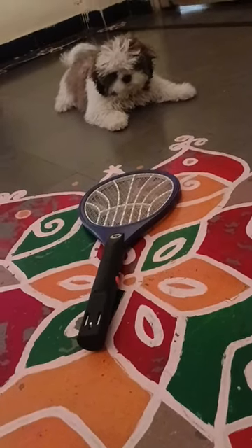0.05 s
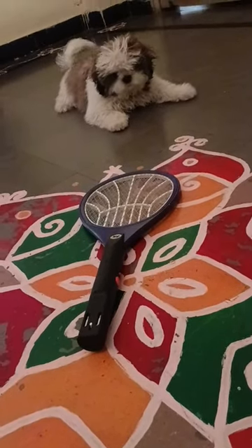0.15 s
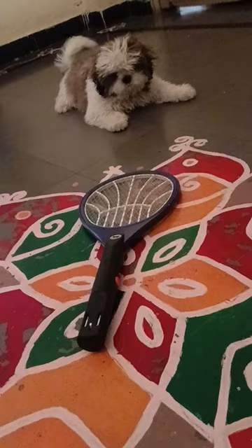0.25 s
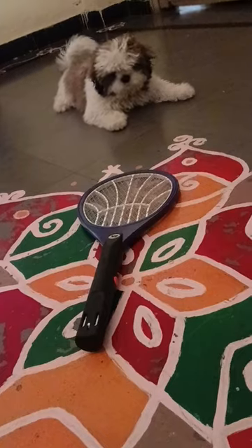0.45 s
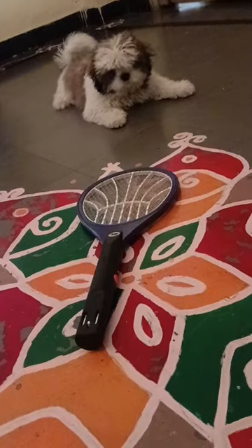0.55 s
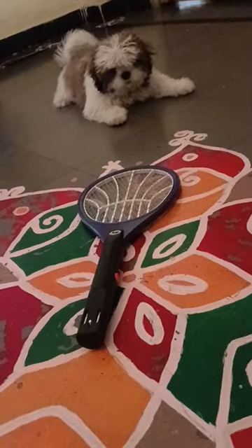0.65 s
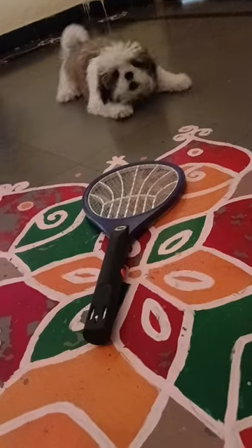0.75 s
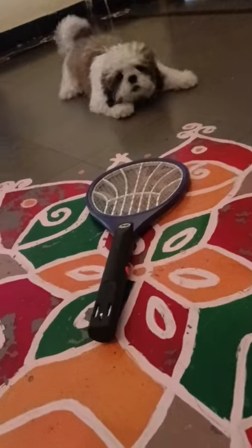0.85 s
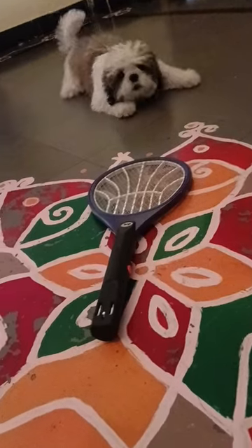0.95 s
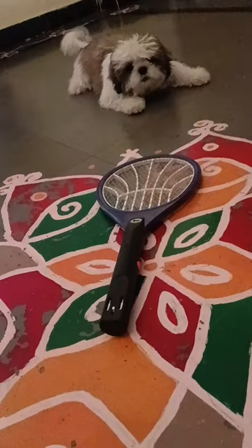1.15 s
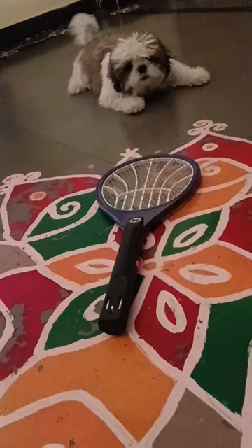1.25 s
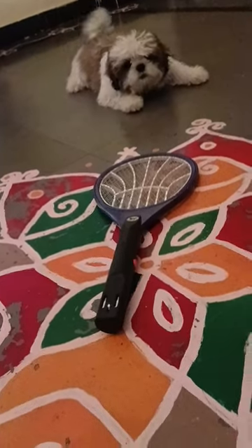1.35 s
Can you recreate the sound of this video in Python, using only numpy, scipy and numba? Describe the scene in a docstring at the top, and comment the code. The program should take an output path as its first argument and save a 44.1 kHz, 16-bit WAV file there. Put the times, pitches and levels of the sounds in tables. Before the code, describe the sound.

A puppy yaps once at about 0.2 seconds, a short, high, slightly rough bark that rises and falls in pitch. Its echo rings in the hard room and fades by about 0.8 seconds. A fan-like rush and hum dips under the bark, then swells back. Soft low bumps come at the start, near 0.8 and around 1.2 to 1.4 seconds, with faint floor scuffs near 0.7 and 1.1.

```python
"""A puppy gives one high, arching yap on the tiled floor of a hard, echoing room, two metres from a phone.
Its rough vocal folds sound through the throat and opening mouth, and air hisses past its teeth.
Walls throw the yap back and ring on over a humming, fan-like rush, with soft low bumps and faint scuffs.
The phone's gain control ducks under the bark, holds, and lets the room noise swell back."""
import sys
import numpy as np
from scipy import signal
from scipy.fft import rfft, irfft
from scipy.io import wavfile
from scipy.ndimage import uniform_filter1d, minimum_filter1d
from numba import njit

SR = 44100
rng = np.random.default_rng(int(sys.argv[2]) if len(sys.argv) > 2 else 0)


def digitize_waveform(pressure):
    """Quantize a signal to 16-bit integers and store it at the path in sys.argv[1].

    Rows of a 2-D input are taken as channels; values are limited to [-1, 1].
    """
    field = np.atleast_2d(pressure).T
    bounded = np.clip(field, -1, 1)
    quanta = np.round(bounded * 32767).astype(np.int16)
    wavfile.write(sys.argv[1], SR, quanta)


N = 61739
TOP_HZ = 15450


def undb(db):
    return 10 ** (np.asarray(db) / 20)


def unit(x):
    """Scaled to rms 1."""
    return x / np.sqrt(np.mean(x ** 2) + 1e-20)


def curve(table, t, column=1):
    """A column of a table, joined by straight lines in time."""
    rows = np.array(table, float)
    return np.interp(t, rows[:, 0], rows[:, column])


def at_hz(table, hz):
    """A table read on a log-frequency axis."""
    rows = np.array(table, float)
    return np.interp(np.log(np.maximum(hz, 1)), np.log(rows[:, 0]), rows[:, 1])


def colour(x, table):
    """Equalises a sound with a (Hz, dB) table."""
    return irfft(rfft(x) * undb(at_hz(table, np.fft.rfftfreq(N, 1 / SR))), N)


def octaves(x):
    """Octave bands (Hz, sound) that add up to the whole."""
    centres = 16000 / 2 ** np.arange(9)[::-1]
    spectrum, f = rfft(x), np.fft.rfftfreq(N, 1 / SR)
    return [(hz, irfft(spectrum * at_hz(np.c_[centres, centres == hz], f), N)) for hz in centres]


def wander(rate):
    """Smooth random motion of rms 1, changing rate times a second."""
    k = max(int(SR / rate), 1)
    steps = rng.standard_normal(N)[np.arange(N) // k]
    return unit(uniform_filter1d(uniform_filter1d(steps, k), k))


def puff(t, start, db, hz, width, attack, decay):
    """Noise in one steep resonance that swells and fades."""
    f = np.fft.rfftfreq(N, 1 / SR) + 1
    detuning = (f * f - hz * hz) / (f * width)
    band = unit(irfft(rfft(rng.standard_normal(N)) / (1 + detuning ** 2), N))
    swell = np.clip((t - start) / attack, 0, 1)
    return undb(db) * band * swell * np.exp(-np.maximum(t - start - attack, 0) / decay)


# The colour of the rush. Each row: frequency in Hz, relative level in dB.
RUSH_EQ = [(20, -35), (35, -20), (90, -5), (140, -5.5), (200, -1), (320, -1.5), (450, -3.5), (560, -11.5),
           (700, 0.5), (900, -5.5), (1150, -3), (1450, -7), (1900, -8.5), (2800, -14), (3800, -26.5),
           (5200, -33.5), (6500, -38.5), (7800, -36.5), (9300, -28.5), (11000, -44), (15500, -56)]
# The motor's tones. Each row: frequency in Hz, level in dB.
MOTOR_TONES = [(108, -47.5), (231.5, -53.5), (349, -44.5), (737, -75)]


def room_tone(t):
    """A fan-like rush, restless in the bass, with a wavering motor hum."""
    rush = hum = 0
    for hz, band in octaves(colour(rng.standard_normal(N), RUSH_EQ)):
        flicker_db = 3.5 if hz < 400 else 2.15
        rush += band * undb(flicker_db * wander(22))
    for hz, db in MOTOR_TONES:
        peak = np.sqrt(2) * undb(db + wander(6.7))
        speed = 1 + .01254 * wander(20)
        hum += peak * np.sin(2 * np.pi * hz * np.cumsum(speed) / SR)
    return undb(-33) * unit(rush) + hum


# Each row: start in seconds, level in dB, centre and width in Hz, attack and decay in seconds.
LOW_BUMPS = [(.015, -32.5, 219, 109, 0.016, 0.041), (.1, -35, 250, 140, .01, 0.024),
             (.77, -28.5, 246, 119, 0.027, 0.054), (1.175, -33.5, 131, 100, 0.024, 0.059),
             (1.243, -29, 78, 58.4, 0.011, 0.024), (1.35, -32, 263, 131, 0.05, 0.066)]


def bumps(t):
    """Soft, dull bumps before and after the yap."""
    return sum(puff(t, *row) for row in LOW_BUMPS)


# Each row: start in seconds, level in dB, centre and width in Hz, attack and decay in seconds.
LIP_TICK = [(.191, -47, 9400, 1400, .004, .012)]


def lips(t):
    """The lips part with a tiny wet tick."""
    return sum(puff(t, *row) for row in LIP_TICK)


# The arch of the yap. Each row: time in seconds, pitch in Hz.
YAP_PITCH = [(.196, 265.2), (.206, 345.3), (.214, 480.2), (.222, 555.5), (.238, 562.4), (.246, 720),
             (.256, 770.3), (.275, 759.1), (.295, 773.1), (.306, 690.8), (.316, 625), (.33, 450.1)]
# Throat and mouth resonances. Each row: frequency in Hz, gain in dB.
THROAT_EQ = [(120, -34), (250, -1), (340, -5.5), (490, -9), (600, -17.5), (770, -4.5), (1100, -0.5),
             (1500, -2.5), (1720, -9), (1980, -10.5), (2300, -21.5), (2600, -32.5), (3000, -20.5),
             (3600, -42.5), (4200, -45), (4600, -42), (5400, -39.5), (6500, -66), (8000, -72), (9000, -63),
             (11000, -64), (15000, -57)]
# The mouth opens, thinning and brightening the yap. Each row: time in seconds, low and high cut in Hz.
MOUTH_CUTS = [(.195, 200, 1840), (.214, 380, 2250), (.228, 616, 3000), (.236, 640, 6500),
              (.255, 650, 14100)]


def voice(t, rough):
    """Jittery vocal folds, a growl of uneven alternate cycles and pulsed rasp, through throat and mouth."""
    jitter_rate = 329.8
    pitch = curve(YAP_PITCH, t) * (1 + .058 * rough * wander(jitter_rate))
    phase = 2 * np.pi * np.cumsum(pitch) / SR
    low_cut, high_cut = curve(MOUTH_CUTS, t), curve(MOUTH_CUTS, t, column=2)

    def mouth(hz):
        return 1 / np.sqrt(1 + (hz / high_cut) ** 10 + (low_cut / hz) ** 10)

    def partial(k, scatter=0):
        hz = k * pitch
        return undb(at_hz(THROAT_EQ, hz)) * mouth(hz) * (hz < TOP_HZ) * np.cos(k * phase + scatter)

    tone = sum(partial(k, scatter=.8 * (k - 1) * rough * wander(jitter_rate)) for k in range(1, 17))
    growl = wander(120) * sum(partial(k + .5) for k in range(1, 5))
    breath = unit(colour(rng.standard_normal(N) * (1 + np.cos(phase)), THROAT_EQ))
    rasp = sum(band * mouth(hz) * undb(2.5 * np.log2(hz / 1000))  # tilted up 2.5 dB an octave
               for hz, band in octaves(breath) if hz > 700)
    return tone + rough * (undb(-13) * growl + undb(-6) * rasp)


# The push behind the yap. Each row: time in seconds, effort in dB, roughness from 0 to 1.
YAP_EFFORT = [(.192, -49, 0.4), (.203, -25, 0.52), (.216, -13.5, 0.73), (.229, 1, 0.16), (.247, -3, 0.67),
              (.265, 1.5, 0.27), (.29, -1.5, .2), (.31, 1, 0.31), (.324, -5.5, 0.41), (.34, -22.5, .4)]
# Hiss at the teeth. Each row: frequency in Hz, relative level in dB.
TEETH_EQ = [(3000, -46), (6500, -16.5), (7800, -8.5), (9000, 1.5), (10500, -2), (12000, -14), (15500, -24)]


def bark(t):
    """One push of breath drives the voice and hisses past the teeth."""
    effort_db, rough = curve(YAP_EFFORT, t), curve(YAP_EFFORT, t, column=2)
    gate = np.clip((t - .1897) / .016, 0, 1) * (t < YAP_EFFORT[-1][0])
    throat = undb(7 + effort_db) * voice(t, rough)
    hiss_db = -29 + .63 * np.maximum(effort_db, -26)
    hiss = undb(hiss_db) * unit(colour(rng.standard_normal(N), TEETH_EQ))
    return gate * (throat + hiss)


# The reverb tail. Each row: frequency in Hz, seconds to fall 60 dB.
TAIL_DECAY = [(200, .45), (500, 0.58), (1000, 0.6), (1800, 0.61), (3500, 0.46), (10000, 0.28),
              (15000, 0.61)]
# First slaps off floor and walls. Each row: delay in seconds, gain in dB.
REFLECTIONS = [(.0052, -13), (0.0124, -7.5), (.0215, -12), (.033, -7), (.078, -9), (.105, -16.5)]
# Pitches the room rings at. Each row: frequency in Hz, gain at resonance in dB, seconds to fall 60 dB.
RINGING_MODES = [(776, 12.5, 0.41), (1111, 2, .3), (1407, 2.5, 0.83), (3200, 2.5, 0.5), (4680, 8, .6)]


def room(x, t):
    """Direct sound, hard reflections, ringing modes and a diffuse tail that thins out below 500 Hz."""
    tail = sum(band * min(hz / 500, 1) * undb(-60 * t / at_hz(TAIL_DECAY, hz))
               for hz, band in octaves(rng.standard_normal(N)))
    tail *= np.minimum(t / .03, 1)  # builds over 30 ms
    response = undb(-3) * tail / np.sqrt(np.sum(tail ** 2))
    response[0] += 1  # direct sound
    for delay, db in REFLECTIONS:
        response[int(delay * SR)] += undb(db)
    for hz, db, t60 in RINGING_MODES:
        damping = np.log(1000) / t60
        response += undb(db) * 2 * damping / SR * np.exp(-damping * t) * np.cos(2 * np.pi * hz * t)
    return signal.fftconvolve(x, response)[:N]


# Each row: start in seconds, level in dB, centre and width in Hz, attack and decay in seconds.
FLOOR_SCUFFS = [(.725, -51, 9000, 5000, .0005, .002), (.736, -50, 11500, 7000, .008, .06),
                (1.062, -52, 9500, 2000, .001, .004)]


def scuffs(t):
    """Faint ticks and a brush across the floor."""
    return sum(puff(t, *row) for row in FLOOR_SCUFFS)


def scene():
    """The puppy in its echoing room, over room tone, scuffs and bumps, in mono."""
    t = np.arange(N) / SR
    puppy = bark(t) + lips(t)
    return (room(puppy, t) + room_tone(t) + scuffs(t) + bumps(t))[None]


@njit
def duck(allowed, hold_s, recover_s):
    """Gain that drops at once to what is allowed, waits while the sound stays loud, then creeps back to 1."""
    out, gain, wait = np.empty(len(allowed)), 1., 0.
    for i in range(len(allowed)):
        gain = min(gain, allowed[i])
        wait = hold_s * SR if allowed[i] < 1.4 * gain else wait - 1
        if wait < 0:
            gain += (1 - gain) / (recover_s * SR)
        out[i] = gain
    return out


def record(dry):
    """The phone's gain control looks a little ahead and ducks the bark; a steep filter cuts the top."""
    limit_db, look_ahead_s = -.7, .0089
    window = 2 * int(look_ahead_s * SR)
    allowed = minimum_filter1d(undb(limit_db) / (np.abs(dry[0]) + 1e-9), window)
    gain = uniform_filter1d(duck(allowed, hold_s=.11, recover_s=.2), window)
    top_cut = signal.ellip(10, .2, 90, TOP_HZ, fs=SR, output="sos")
    return signal.sosfilt(top_cut, dry * gain)


dry = scene()
out = record(dry)
digitize_waveform(out)
```